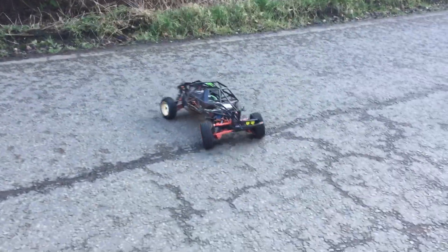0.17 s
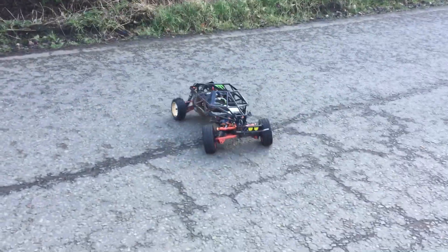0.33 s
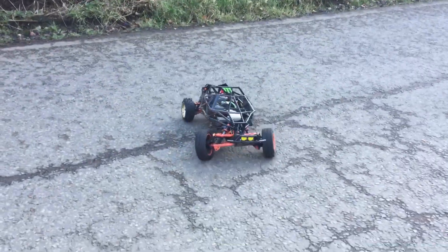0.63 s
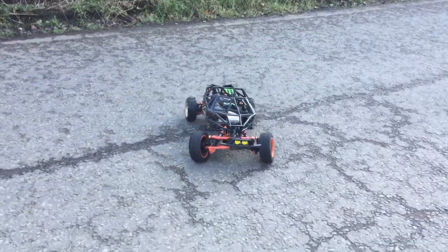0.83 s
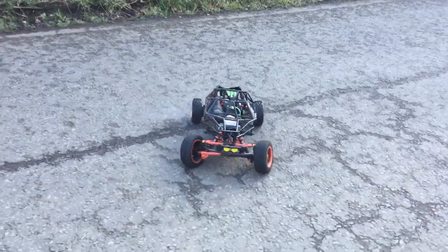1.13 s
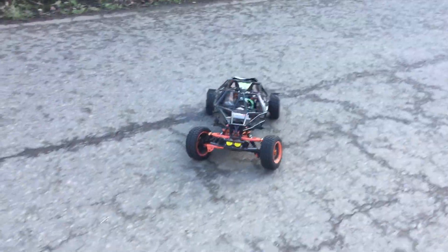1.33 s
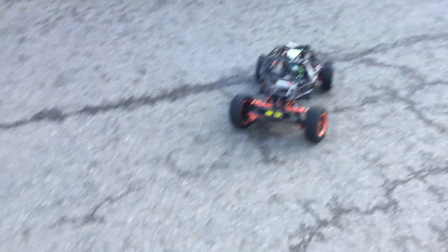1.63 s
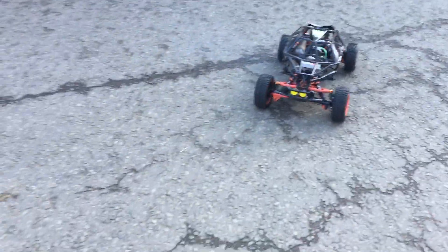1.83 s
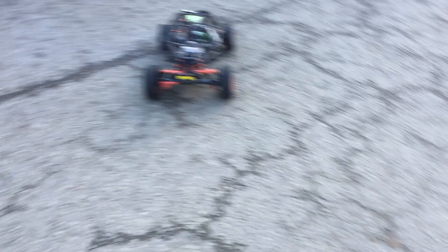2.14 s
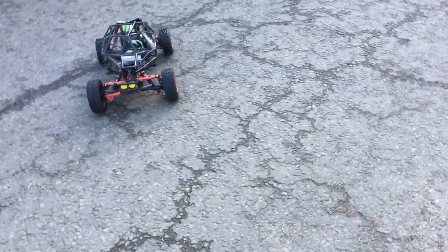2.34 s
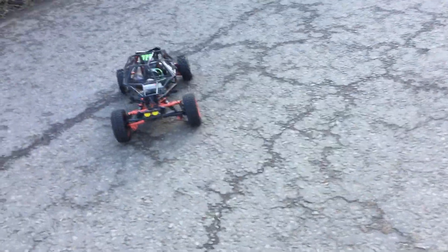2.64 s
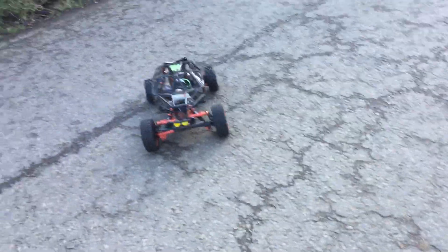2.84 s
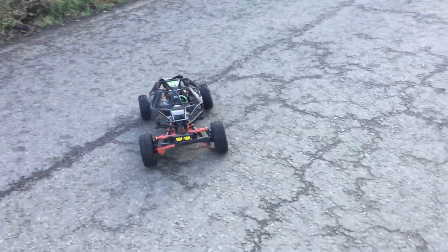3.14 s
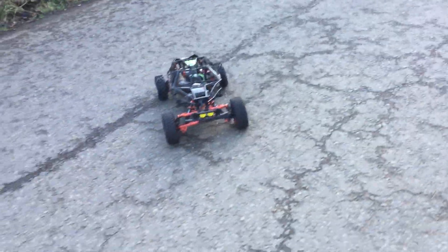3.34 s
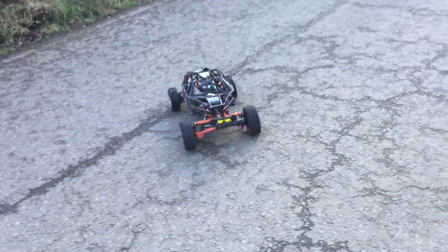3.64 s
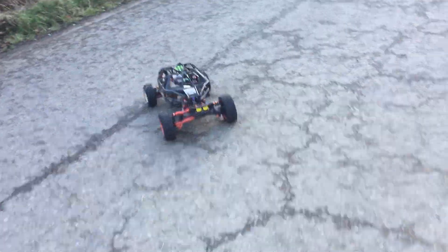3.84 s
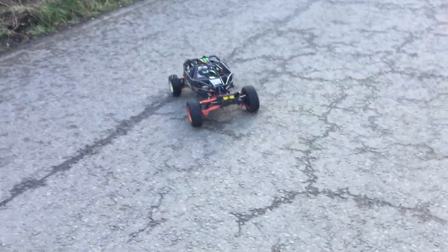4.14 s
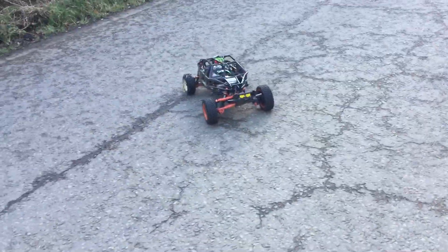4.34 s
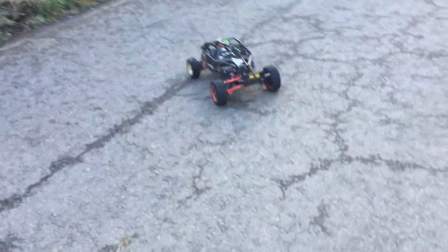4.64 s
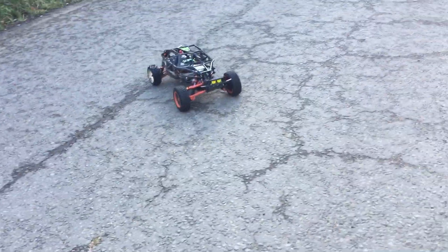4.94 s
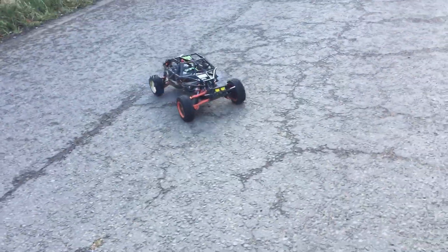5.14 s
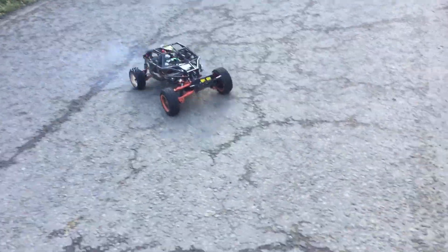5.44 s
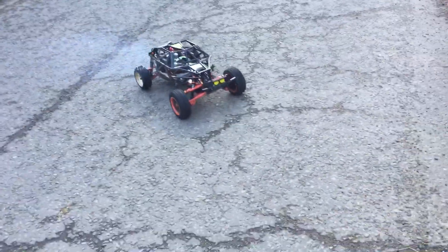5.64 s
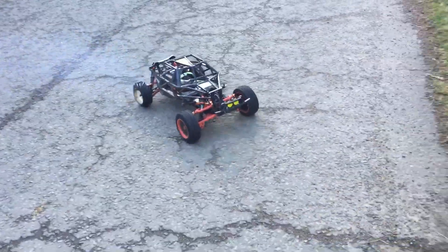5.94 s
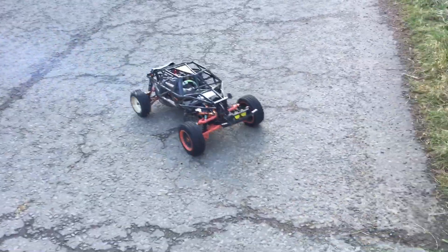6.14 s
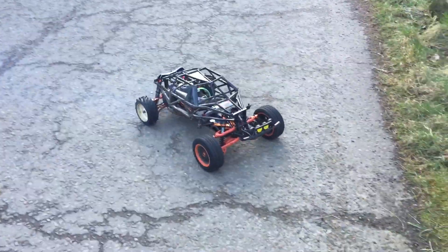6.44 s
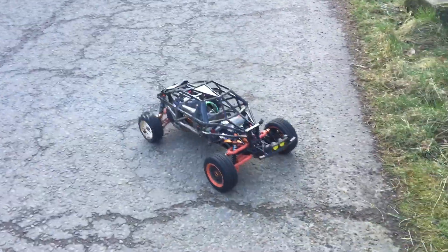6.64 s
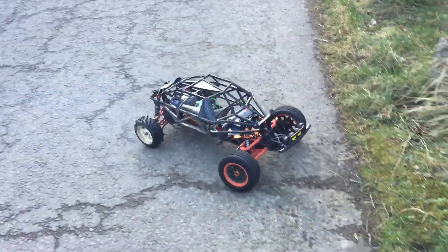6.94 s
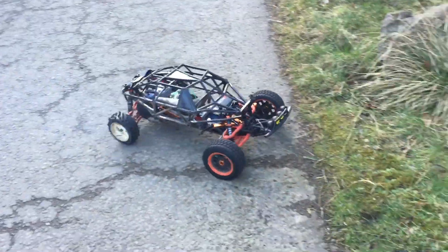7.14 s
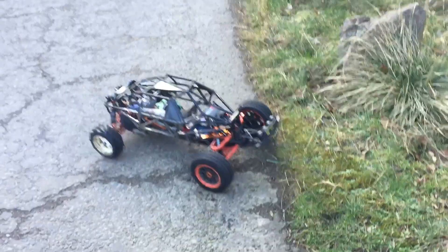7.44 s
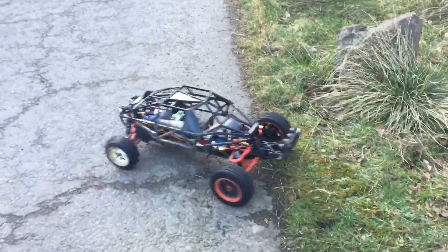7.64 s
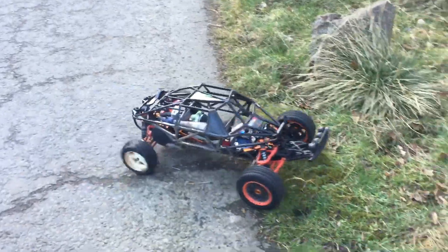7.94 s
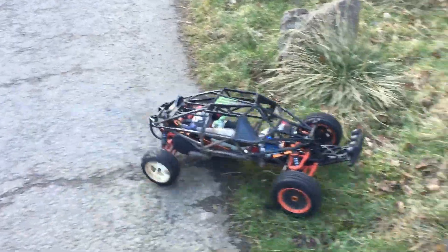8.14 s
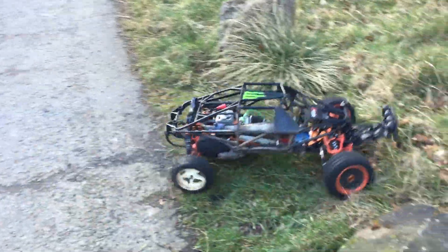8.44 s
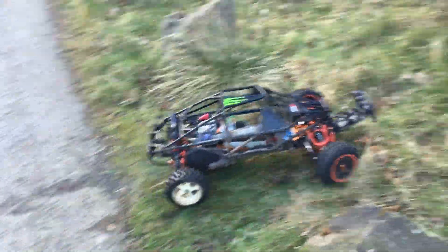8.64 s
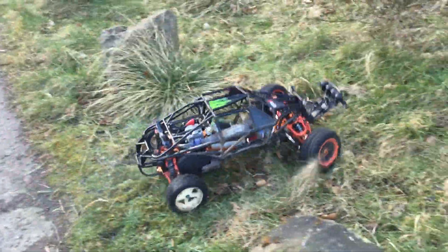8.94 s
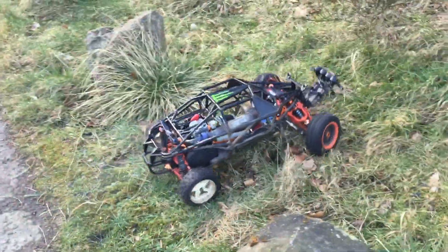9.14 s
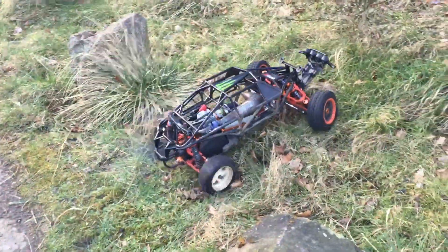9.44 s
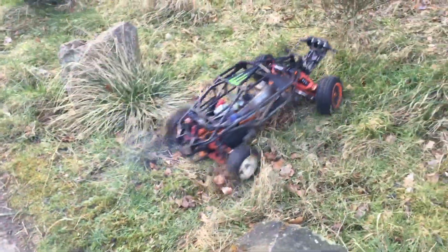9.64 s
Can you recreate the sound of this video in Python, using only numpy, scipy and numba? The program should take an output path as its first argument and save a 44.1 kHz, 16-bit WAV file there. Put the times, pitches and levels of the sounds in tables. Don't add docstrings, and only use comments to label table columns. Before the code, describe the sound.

A small two-stroke model buggy engine runs outdoors on asphalt, a few metres from the microphone. Two early raspy revs sink to a lumpy, rattling tick-over with irregular pops. After several seconds, sharp bangs and short snarling throttle blips return, in quick pairs and clusters, each falling back to a fast metallic putter. The loudest blasts overload slightly; echoes and low wind are very faint.

```python
import sys
import numpy as np
from scipy import signal
from scipy.fft import rfft, irfft
from scipy.io import wavfile
from numba import njit

SR = 44100
rng = np.random.default_rng(int(sys.argv[2]) if len(sys.argv) > 2 else 0)


def field_ratio(decibels):
    return 10 ** (np.asarray(decibels, dtype=float) / 20)


def file_out(sig):
    cols = np.atleast_2d(sig).T
    lim = np.clip(cols, -1, 1)
    pcm = np.round(lim * 32767).astype(np.int16)
    wavfile.write(sys.argv[1], SR, pcm)


N = 431735

# pitch_hz, level_db (per Hz)
CRACK_SPECTRUM = [(1530, -23.5), (2600, -0.5), (2850, 1.5), (4390, 3), (4920, 2), (6380, -5), (7480, -6.5),
                  (12200, -9), (16000, -15.5)]
# pitch_hz, level_db (per Hz)
BARK_SPECTRUM = [(380, -25.5), (650, -22.5), (867, -7.5), (989, -14.5), (1220, -2.5), (1770, 8), (2190, 2),
                 (2450, -1.5), (2900, -9.5), (3770, -10.5), (6380, -120)]
# pitch_hz, level_db (per Hz)
THROB_SPECTRUM = [(35, -86), (60, 13.5), (164, 12), (347, 8.5), (497, -9.5), (644, 10), (800, -2.5),
                  (1040, 10.5), (1760, -120)]


def exhaust():
    crack, bark, throb = firings()
    blast = bursts(crack, .05, .84, .22, reach=.22)
    barking = bursts(bark, .05, .88, .06, reach=.2)
    edge = np.convolve(blast, [1, -2, 1], "same")
    blast = blast - 0.0037 * (crank()[0] - 75) * edge
    snap = 0.13 * bark
    bright = field_ratio(-7.5) * colour(blast, CRACK_SPECTRUM) + can(blast) + colour(barking + snap, BARK_SPECTRUM)
    return bright + verge(bright) + colour(throb, THROB_SPECTRUM)


# start_s, end_s, crack_level_db, bark_over_crack_db, fade_s
BLIPS = [(0.518, 0.681, -4.5, -7, 0.075), (0.931, 1.163, -7, -6.5, 0.068), (4.492, 4.56, -3, -5.5, .012),
         (4.769, 4.907, -4, -7.5, 0.039), (5.045, 5.232, -10, -11, 0.034),
         (5.423, 5.613, -10, -11.5, 0.021), (6.219, 6.429, -6, -3.5, 0.076),
         (7.404, 7.52, -11.5, 2.5, 0.039), (7.554, 7.766, -11, -0.5, 0.064), (7.939, 8.151, -11, -1.8, .01),
         (8.738, 8.976, -7.5, -6.5, 0.076), (9.123, 9.356, -10.5, -1.5, 0.035),
         (9.51, 9.85, -10, -10, 0.012)]
# start_s, peak_db
IDLE_POPS = [(2.44, 2), (2.5062, -18), (2.5591, 2), (2.625, -6), (2.6939, 4.5), (2.9047, -17),
             (2.9239, -14), (2.9767, -8), (3.031, -21.5), (3.048, -11), (3.1739, -8.5), (3.2273, -13),
             (3.279, -17), (3.3542, -14), (3.4089, -6.5), (3.463, -18), (3.5192, -0.5), (3.5886, -16),
             (3.6453, -11), (3.7022, -0.5), (3.8105, -16), (3.9081, -14.5), (3.9658, -5), (4.157, -13.5),
             (4.2359, -10), (4.2923, -19), (4.3878, -16)]
# start_s, peak_db
STRAY_POPS = [(0.0234, -7), (0.199, -18), (0.3353, -10), (0.396, -2), (0.4688, 2.5), (0.5008, 3),
              (1.5234, -12.5), (1.63, -9), (1.7704, -9.5), (1.8221, 2), (1.9816, -19), (2.0222, -18),
              (2.0821, -13.5), (4.446, 3), (6.1654, -8.5), (6.7644, 0.1), (6.9235, -10), (6.9587, -15),
              (7.0206, -14), (7.1043, -22), (7.1287, -23), (7.1655, -2), (7.202, -1.5), (7.235, 1),
              (7.2548, -0.5), (7.283, -16), (8.579, -17), (8.6446, -20), (7.056, -20), (7.386, -4.5)]
# start_s, peak_db
BANGS = [(4.569, 2.5), (4.589, -2), (4.6294, -9.5), (4.7524, 8), (4.9184, -3), (4.9242, -1), (5.03, 1),
         (5.247, -1.5), (5.6296, -2), (5.6624, -1.5), (8.1623, -16), (8.169, -5.5), (9.4867, 1)]


def firings():
    trains = np.zeros((3, N))
    slow_hz = np.maximum(122.5 - crank()[0], 0)
    every_turn = turns(1.0)
    for first, last, crack_db, bark_db, fade_s in BLIPS:
        span = slice(round(first * SR), min(round(last * SR), N))
        time = np.arange(span.start, span.stop) / SR
        fading = np.clip(1 - (last - time) / max(fade_s, 1 / SR), 0, 1)
        sag_db = 37 * (time - first)
        loss_db = 0.36 * slow_hz[span] + sag_db + 13.5 * fading
        bark_over_db = bark_db + 0.37 * loss_db
        throb_over_db = -13 + 0.29 * slow_hz[span]
        gains = field_ratio(crack_db - loss_db + np.array([0 * time, bark_over_db, throb_over_db]))
        trains[:, span] += gains * every_turn[span]
        trains[:, span.start] += gains[:, 0] * field_ratio(21.5)
    side = side_on()
    for pops, sharp in (([*IDLE_POPS, *STRAY_POPS], False), (BANGS, True)):
        for start_s, peak_db in pops:
            at = round(start_s * SR)
            bark_db = -8.5 if sharp else -3 + 7.5 * side[at]
            bark_db -= 0.73 * peak_db
            trains[:, at] += field_ratio([peak_db + 14.0, peak_db + bark_db + 12.5, peak_db + .5 * bark_db + 5.0])
    return trains


# pitch_hz, width_hz, nose_on_level_db, side_on_level_db
CAN_MODES = [(1150, 387, -19.5, -4.5), (2900, 55, 6.5, -18), (3116, 450, -1.5, -33), (3597, 77, 3.5, -19.5),
             (4230, 58, 2.5, -6), (4590, 39, 5, -43), (5560, 30, -0.5, -10), (6074, 130, -3, -4.5),
             (6690, 150, -23, 0), (7780, 180, -18, -19), (9280, 17, -9.5, -2)]


def can(blast):
    out, side = np.zeros(N), np.clip(side_on(), 0, 1)
    heat = 1 + .045 * (crank()[0] - 110) / 100
    for hz, width_hz, nose_db, side_db in CAN_MODES:
        wander_db = 2.5 * drift(1.5)
        gain_db = nose_db + side * (side_db - nose_db) + 10.5 + wander_db
        out += field_ratio(gain_db) * resonate(blast, hz * heat, width_hz)
    return out


# delay_s, level_db
BANK_ECHOES = [
    (0.025, -33),
    (.055, -18),
]


def verge(x):
    dull = signal.lfilter([.45], [1, -.55], x)
    return sum(field_ratio(db) * np.pad(dull, (round(delay_s * SR), 0))[:N] for delay_s, db in BANK_ECHOES)


# multiple_of_crank_rate, level_db
SONG = [(1, -14), (2, -9), (3, -21), (4, -11.5), (5, -7), (6, -12), (7, -5), (8, -4.5), (9, -3), (10, -3),
        (11, -10), (12, -4.5), (13, -12)]


def crank_lines():
    thin = 8
    speed, load = [curve[::thin] for curve in crank()]
    level_db = -39.5 + 9 * side_on()[::thin] + 9 * load + 0.36 * (speed - 150)
    phase = 2 * np.pi * np.cumsum(speed) * thin / SR
    lines = np.zeros(len(phase))
    for multiple, db in SONG[1:]:
        swell = field_ratio(db + 3.2 * drift(6.3)[::thin])
        lines += swell * np.sin(round(multiple) * phase + rng.uniform(0, 2 * np.pi))
    return signal.resample_poly(field_ratio(level_db) * lines, thin, 1)[:N]


# pitch_hz, level_db (per Hz)
PUMP_SPECTRUM = [(53, -25), (90, -4.5), (160, -3), (230, 0), (310, -1), (390, -12), (450, 0), (560, -5.5),
                 (700, -3.5), (850, -1), (1050, -21.5), (1760, -103)]
# pitch_hz, level_db (per Hz)
RATTLE_SPECTRUM = [(320, -40.5), (550, -8), (829, -19), (920, -0.5), (1260, -4.5), (1500, 6.5),
                   (1620, -7.5), (1670, 8.5), (1770, 6), (2900, -10), (3770, -10), (6380, -120)]
# pitch_hz, level_db (per Hz)
HISS_SPECTRUM = [(1530, -14), (2600, 1.5), (3070, 7.5), (3470, -12.5), (3720, 3.5), (4200, 5.5), (4850, -4),
                 (6380, -1.5), (7480, -6.5), (9120, -7), (10300, -16.5), (13000, -10), (16000, -24)]


def unfired():
    speed, load = crank()
    tone_db, pump_db, rattle_db, hiss_db = running_db(speed, load)
    lumpy = np.clip((85 - speed) / 30, 0, 1)
    tone = np.sqrt(2) * np.sin(2 * np.pi * np.cumsum(speed) / SR)
    strokes = turns(1.2)
    pump = colour(bursts(strokes, .05, .85, .03 + .05 * lumpy, reach=.3), PUMP_SPECTRUM)
    rattle = colour(bursts(turns(1.5), .1, .6, .12 + .48 * lumpy, reach=.45), RATTLE_SPECTRUM)
    hiss = colour(bursts(turns(2.5), .1, .6, .5, reach=.3), HISS_SPECTRUM)
    thump = signal.sosfilt(signal.butter(3, [125, 293], "band", fs=SR, output="sos"), strokes)
    lows = signal.sosfiltfilt(signal.butter(3, 497, fs=SR, output="sos"), pump)
    pump += lumpy ** 2 * (thump / thump.std() - lows)
    hiss -= 0.6 * side_on() * np.convolve(hiss, [1, -2, 1], "same")
    metal = field_ratio(rattle_db + 0.42 * drift(11.5)) * rattle
    air = field_ratio(hiss_db + 2.56 * drift(5.7)) * hiss
    return field_ratio(tone_db + 2.4 * drift(10)) * tone + field_ratio(pump_db) * pump + metal + air


# crank_rate_hz, tone_level_db, pump_level_db, rattle_level_db, hiss_level_db
RUNNING = [(53.4, -41.5, -29, -27, -41.5), (66, -30.5, -25, -23.5, -31.5), (91, -30, -29, -21, -29.5),
           (110, -33, -33.5, -23, -26.5), (141, -55, -39, -23.5, -26.5), (167, -39, -39.5, -22.5, -20)]
LOAD_DB = [3.2, 3.3, 2.6, 7.2]
SHADE_DB = [-6.5, -13.5, -3, -11]
# start_s, level_db
NEARNESS = [(0, -1), (.5, 5), (1.2, -1.5), (1.8, 1), (2.7, 2.5), (3.5, 3.7), (4.5, 2.4), (5.2, -2),
            (6.1, -1), (7, -0.1), (7.6, 3.5), (8.4, -4.5), (8.9, 2.5), (9.5, 2.5), (9.79, -1.5)]


def running_db(speed, load):
    hz, *layers = np.transpose(RUNNING)
    side, near_db = side_on(), in_time(NEARNESS)[0]
    return [np.interp(speed, hz, db) + load_db * load ** 2 + shade_db * side + near_db
            for db, load_db, shade_db in zip(layers, LOAD_DB, SHADE_DB)]


# open_s, shut_s, target_crank_rate_hz
THROTTLE = [(0.447, 0.651, 151.2), (0.895, 0.992, 230.5), (4.429, 4.568, 99), (4.711, 4.826, 245.2),
            (4.975, 5.126, 173.9), (5.371, 5.522, 179.3), (6.168, 6.289, 258), (7.14, 7.266, 105.1),
            (7.335, 7.461, 138), (7.498, 7.612, 177.2), (7.89, 8.021, 185.2), (8.693, 8.833, 175.4),
            (9.084, 9.191, 180.5), (9.435, 9.9, 177.4)]


def throttle(time):
    opens, shuts, _ = np.transpose(THROTTLE)[:, :, None]
    open_s, shut_s = .093, .081
    return np.clip(np.minimum((time - opens) / open_s, 1 - (time - shuts) / shut_s), 0, 1)


# start_s, crank_rate_hz
REST = [(0, 47.3), (.2, 45.97), (.45, 67.9), (.9, 78.84), (1.6, 76.2), (1.9, 67.46), (2.3, 53.9),
        (3.1, 50.07), (3.9, 47.2), (4.35, 54.04), (4.7, 79.6), (6.1, 80.25), (7.1, 79.43), (8.6, 86.13),
        (9.79, 63.8)]


def crank():
    steps = 250
    pull_hz_per_s, pull_knee_hz = 709, 37.94
    drag_hz_per_s, drag_knee_hz = 239, 40.85
    time = np.arange(N * steps // SR + 2) / steps
    opening = throttle(time)
    load = opening.max(axis=0)
    top = np.array(THROTTLE)[opening.argmax(axis=0), 2]
    rest, kicks = np.interp(time, *np.transpose(REST)), np.zeros(len(time))
    start_s, peak_db = np.transpose(IDLE_POPS)
    kicks[(start_s * steps).astype(int)] = 2.7 * field_ratio(.4 * peak_db)
    speed = [54.82]
    for share, goal, low, kick in zip(load, top, rest, kicks):
        pull = share * pull_hz_per_s * np.tanh((goal - speed[-1]) / pull_knee_hz)
        drag = (1 - share) * drag_hz_per_s * np.tanh((speed[-1] - low) / drag_knee_hz)
        speed.append(speed[-1] + (pull - drag) / steps + kick)
    return [np.interp(np.arange(N) / SR, time, curve) for curve in (speed[:-1], load)]


def turns(uneven_db):
    speed = crank()[0]
    at = np.interp(np.arange(int(speed.sum() / SR)), np.cumsum(speed) / SR, np.arange(N))
    stumble = .00022 * SR * np.clip((85 - speed[at.astype(int)]) / 30, .04, 1)
    at = np.abs(at + stumble * rng.standard_normal(2000)[:len(at)])
    sample = at.astype(int)
    size = np.sqrt(SR / speed[sample]) * field_ratio(uneven_db * rng.standard_normal(2000)[:len(at)])
    clicks = np.zeros(N + 1)
    clicks[sample] = size * (1 - at % 1)
    clicks[sample + 1] = size * (at % 1)
    return clicks[:N]


def bursts(clicks, t60, scatter, rough, reach):
    wake = signal.unit_impulse(SR // 8)
    for lag in (reach * t60 * SR * np.array([.02, .035, .06, .1])).astype(int) + 2:
        taps = np.zeros(lag + 1)
        taps[[0, lag]] = 1, np.clip(scatter, 0, .9)
        wake = signal.lfilter(taps[::-1], taps, wake)
    fade = field_ratio(-60 * np.arange(SR // 8) / SR / t60)
    power = signal.oaconvolve(clicks ** 2, fade ** 2 / np.sum(fade ** 2))[:N]
    fresh = np.sqrt(np.abs(power)) * rng.standard_normal(N)
    return np.sqrt(1 - rough) * signal.oaconvolve(clicks, wake)[:N] + np.sqrt(rough) * fresh


# start_s, side_on_share (0-1)
FACING = [(0, 0), (1, 0.31), (2.5, 0.06), (4.4, 0.11), (5.6, 0.19), (6.3, 0.38), (7.6, 0.63), (8.1, 0.28),
          (8.9, 0.62), (9.35, 0.74), (9.6, 1)]


def side_on():
    return in_time(FACING)[0]


def interference(x, depth_db):
    patches_hz = np.geomspace(420, 14000, 26)
    return x + sum((field_ratio(depth_db * drift(2.23)) - 1) * resonate(x, hz, 0.048 * hz) for hz in patches_hz)


# pitch_hz, level_db (per Hz)
WIND_SPECTRUM = [(20, -21), (45, -7), (70, 5), (140, 1), (400, -5), (900, -33.5)]
# start_s, level_db
GUSTS = [
    (0.0, -34.5),
    (0.52, -42),
    (1.28, -48),
    (3.46, -41.5),
    (4.88, -42),
    (5.1, -57),
    (6.9, -57),
    (7.53, -50),
    (8.18, -65),
    (9.79, -52),
]


def wind():
    level_db = in_time(GUSTS)[0] + 11.0 + 2 * drift(0.83)
    return field_ratio(level_db) * colour(rng.standard_normal(N), WIND_SPECTRUM)


def in_time(rows):
    start_s, *columns = np.transpose(rows)
    return [np.interp(np.arange(N) / SR, start_s, column) for column in columns]


def drift(rate):
    knots = rng.standard_normal(int(N / SR * 60) + 2)
    r = np.exp(-2 * np.pi * rate / 60)
    slow = signal.lfilter([1], [1, -r], knots)
    return np.interp(np.arange(N) / SR * 60, np.arange(len(slow)), slow / slow.std())


def colour(x, spectrum):
    hz, level_db = np.transpose(spectrum)
    grid_hz = np.maximum(np.arange(4097) * SR / 8192, 1)
    curve_db = np.clip(np.interp(np.log(grid_hz), np.log(hz), level_db), -70, 30)
    cepstrum = irfft(np.log(field_ratio(curve_db)))
    cepstrum[1:4096] *= 2
    cepstrum[4097:] = 0
    response = irfft(np.exp(rfft(cepstrum)))
    return signal.oaconvolve(x, response / np.linalg.norm(response))[:N]


def resonate(x, hz, width_hz):
    r = np.exp(-np.pi * width_hz / SR)
    return gliding(x, 2 * r * np.cos(2 * np.pi * hz / SR) * np.ones(N), r)


@njit
def gliding(x, bend, r):
    y = np.zeros(len(x))
    for i in range(2, len(x)):
        y[i] = (1 - r) * (x[i] - x[i - 2]) + bend[i] * y[i - 1] - r * r * y[i - 2]
    return y


def scene():
    engine = interference(unfired() + exhaust(), depth_db=3.2)
    return (engine + crank_lines() + wind())[None]


def roll_off(x):
    return signal.sosfilt(signal.butter(12, 16270, fs=SR, output="sos"), x)


def record(dry):
    top, knee = 1.0, 6
    mix = dry / (1 + np.abs(dry / top) ** knee) ** (1 / knee)
    return roll_off(mix)


dry = scene()
out = record(dry)
file_out(out)
```